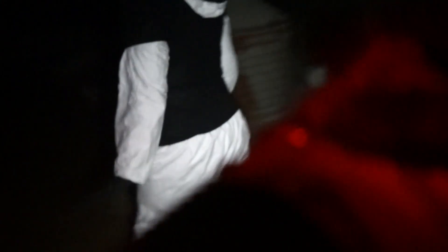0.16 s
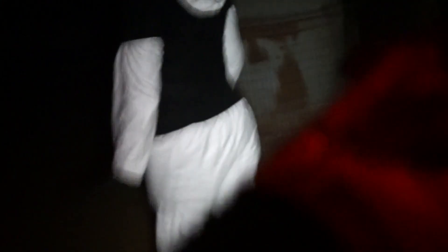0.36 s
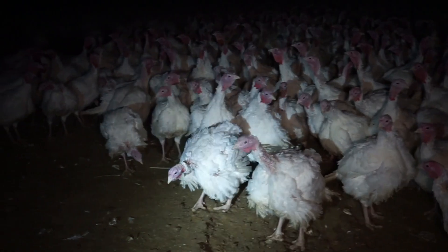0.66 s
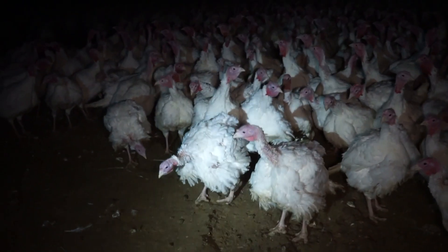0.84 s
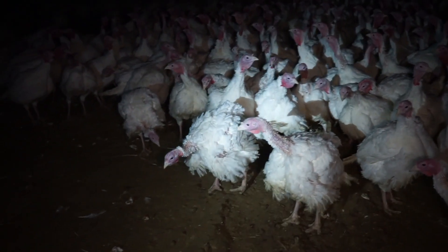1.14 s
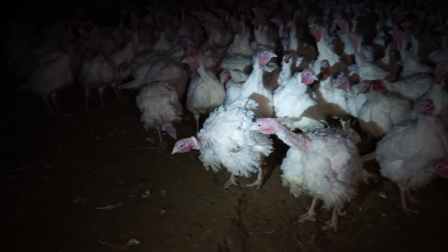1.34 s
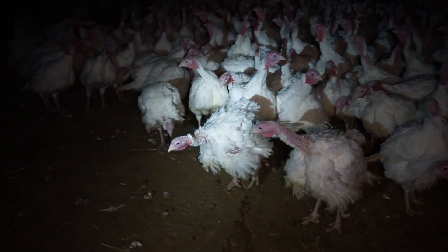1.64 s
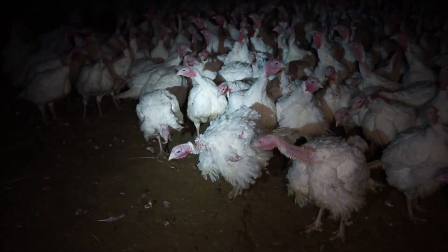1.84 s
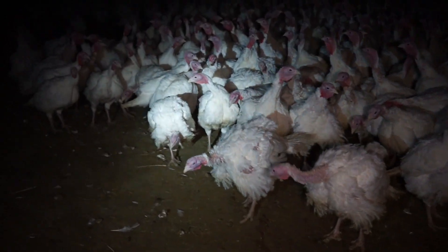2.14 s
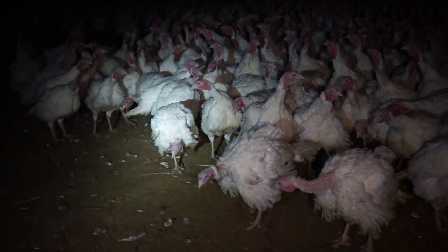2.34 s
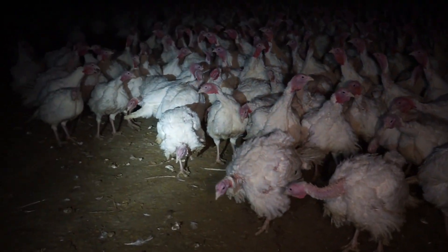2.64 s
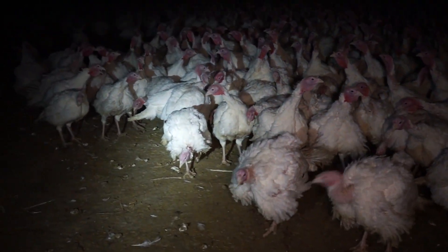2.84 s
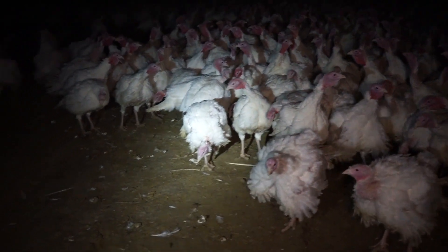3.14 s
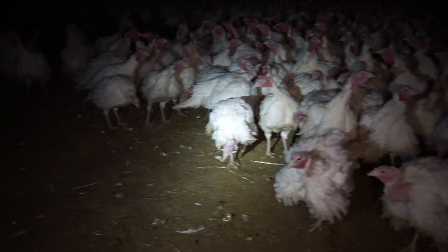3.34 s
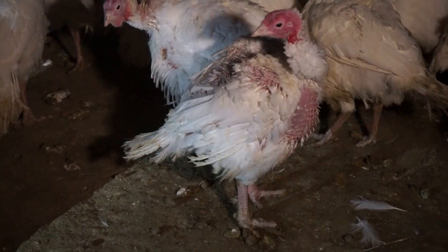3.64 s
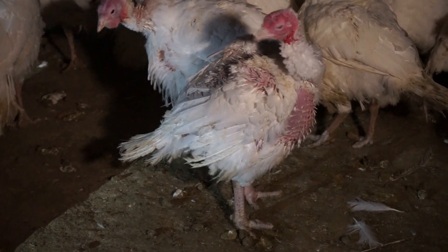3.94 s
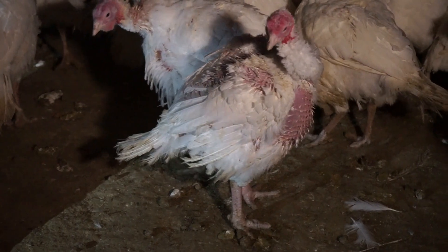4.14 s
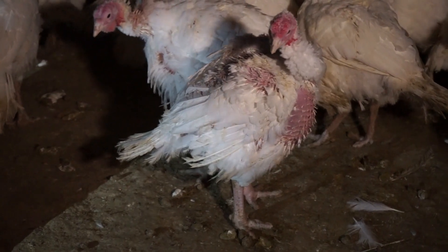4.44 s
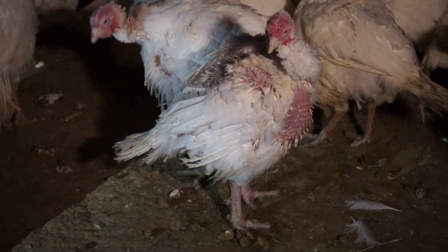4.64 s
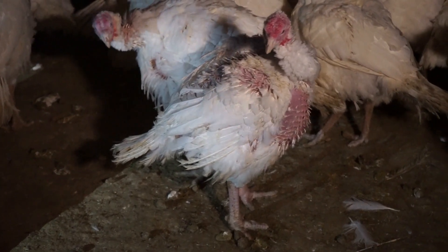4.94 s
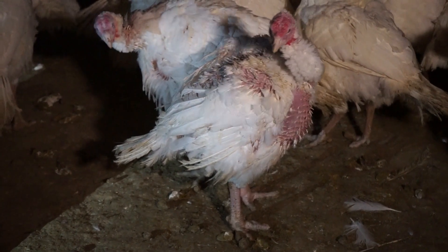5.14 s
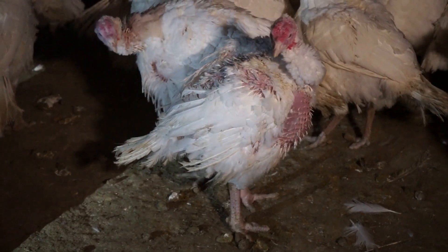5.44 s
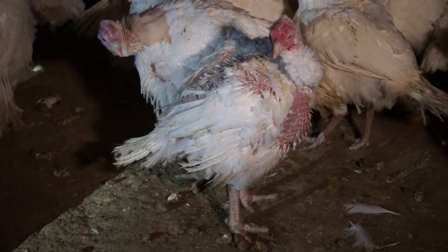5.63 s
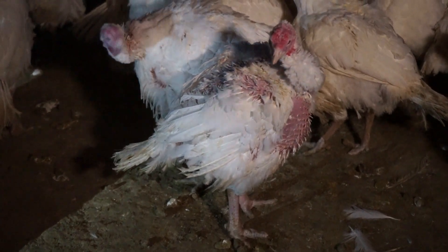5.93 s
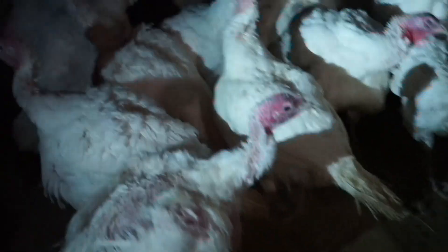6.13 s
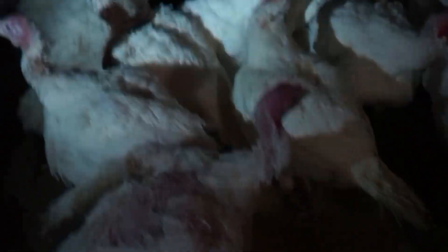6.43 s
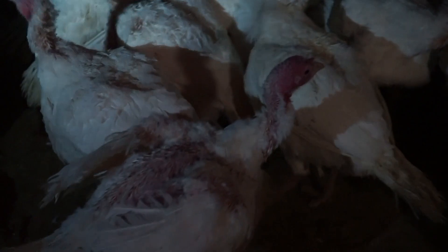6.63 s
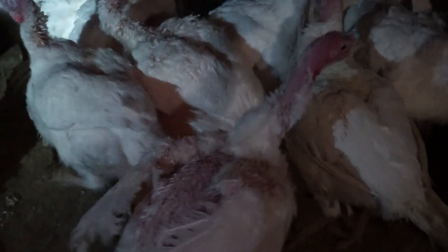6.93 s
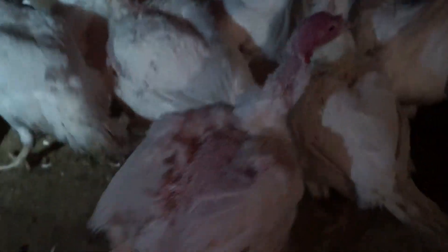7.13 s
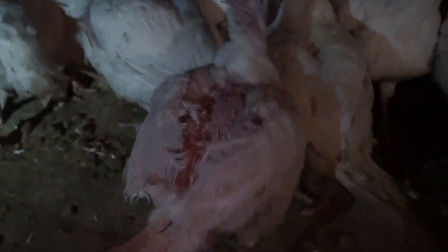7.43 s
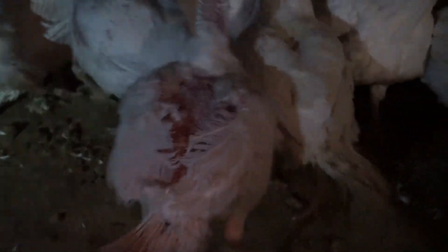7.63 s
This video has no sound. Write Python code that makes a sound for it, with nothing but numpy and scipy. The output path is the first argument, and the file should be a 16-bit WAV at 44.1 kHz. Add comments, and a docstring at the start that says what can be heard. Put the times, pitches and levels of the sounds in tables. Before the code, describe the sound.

Brief handling noise, cloth rustle and a single thud open the scene, then at once the microphone is among hundreds of turkeys indoors. Near birds give snappy, overlapping clucks and whistling yelps, slightly to the right, with small airy puffs; the rest babble behind, duller and wide. Reverberation trails each call. Calls become sparse and nearly stop, fans hum, feet scuff litter, and a lively chorus returns to the end.

```python
"""Turkey flock in a big barn

A microphone is handled outdoors for half a second: grip rumble, rustle and a thud over a fading trace of
distant birds. Then it stands among turkeys. Near clucks and yelps are gliding tones with overtones shaped
by the throat, breath puffs are bursts of noise, and hundreds of overlapping calls make the far chatter.
Coloured noise gives the fan hum and shuffling feet. Sparse decaying reflections let the barn ring after
every call, and gain control lifts the hum whenever the birds pause."""
import sys
import numpy as np
from scipy import signal
from scipy.io import wavfile
from scipy.ndimage import uniform_filter1d, map_coordinates

SR = 44100
rng = np.random.default_rng(int(sys.argv[2]) if len(sys.argv) > 2 else 0)


def volts(x):
    """Linear amplitude factor 10**(x/20) for a level x in dB, scalar or array-like."""
    e = np.asarray(x, float) / 20
    return 10 ** e


def dump(signal):
    """Clip the signal to [-1, 1] and save it as 16-bit WAV at the path in sys.argv[1]."""
    limited = np.clip(np.atleast_2d(signal).T, -1, 1)
    pcm = np.round(limited * 32767).astype(np.int16)
    wavfile.write(sys.argv[1], SR, pcm)


N = 343098
INSIDE_S = .5  # the barn begins here


def evened(x):
    """Scales a sound to an rms of one."""
    return x / np.sqrt(np.mean(x ** 2) + 1e-20)


def read(points, hz):
    """Reads a table over frequency, with straight lines on a log axis."""
    f, value = np.transpose(points)
    return np.interp(np.log(hz + 1), np.log(f + 1), value)


def curve(rows, column):
    """Draws one table column as a line over the whole scene."""
    rows = np.array(rows)
    return np.interp(np.arange(N) / SR, rows[:, 0], rows[:, column])


def add(mix, s, sound):
    """Lays a sound into the mix at s seconds, cut off at the end."""
    part = mix[..., round(s * SR):][..., :sound.shape[-1]]
    part += sound[..., :part.shape[-1]]


def panned(x, pan_db):
    """Sets the left-right level difference; positive leans left."""
    return x * volts(np.array([pan_db / 2, -pan_db / 2]).reshape(2, -1))


def alike(z, same):
    """Blends the second channel's spectrum towards the first."""
    same = np.clip(same, -1, 1)[:, None]
    return np.array([z[0], same * z[0] + np.sqrt(1 - same ** 2) * z[1]])


def hiss(spectrum, same, patchy_db):
    """Stereo noise of a given colour with drifting patches."""
    hz = np.fft.rfftfreq(1024, 1 / SR)
    a, b, c, d, patches = rng.standard_normal((N // 256 + 5, 513, 5)).T
    patches = uniform_filter1d(patches, size=9, axis=0)
    patches = evened(uniform_filter1d(patches, size=9, axis=1))
    z = alike([a + 1j * b, c + 1j * d], read(same, hz))
    z = z * volts(read(spectrum, hz)[:, None] + patchy_db * patches)
    return evened(signal.istft(z, nperseg=1024, noverlap=768)[1][:, :N])


# Windpipe and mouth resonances that lift the overtones.
# Each row: centre in Hz, width in Hz, strength in dB.
THROAT = [(1680, 1040, -5), (2270, 1000, -22), (3525, 270, -4.5), (5840, 250, 0.5), (8070, 470, -11)]


def call(db, start_hz, end_hz, length, overtones_db, rough, dull=0.7, attack_s=0.0052):
    """A gliding whistle from the voice box whose upper overtones and rasp grow as the beak opens."""
    flutter_db = 5  # unsteady breath makes the longer calls waver in level
    u = np.linspace(0, 1, max(round(length * SR), 200))  # progress through the call
    seconds = u * length

    unsteady = uniform_filter1d(rng.standard_normal((2, 7000)), size=40)[:, :len(u)]
    shake, rasp = unsteady * rough * u ** 1.66
    breath = uniform_filter1d(rng.standard_normal(700), size=30)
    breath_db = flutter_db * evened(uniform_filter1d(breath, size=30))
    breath_db = np.repeat(breath_db, 10)[:len(u)] * np.minimum(seconds / 0.055, 1)

    hz = start_hz * (end_hz / start_hz) ** u ** 1.323 * (1 + 0.84 * shake)
    turns = 2 * np.pi * np.cumsum(hz) / SR
    order = np.arange(2, 12)[:, None]
    throat = 0.13 + sum(volts(d) / (1 + (2 * (order * hz - f) / w) ** 2) for f, w, d in THROAT)
    fall_db = 6.64 + 3.3 * (1 - u) ** 2  # per order: steep while the beak is still shut
    overtones = volts(overtones_db - dull * fall_db * (order - 3)) * throat
    overtones = overtones * (order * hz < .4 * SR)  # keeps clear of aliasing

    voice = np.sin(turns) * (1 + 0.43 * rasp)
    upper = (overtones * np.sin(order * turns + 0.641 * order ** 2)).sum(0)
    voice = voice + upper * (1 + 5.4 * rasp)
    swell = np.sin(np.pi / 2 * np.minimum(seconds / max(attack_s, .001), 1)) ** 2
    release = np.minimum((1 - u) * length / 0.0013, 1)
    return volts(db + breath_db) * voice * swell * np.exp(.3 - 0.11 * u) * release


# Short clucks close by, pitch snapping up or sagging.
# Each row: start in seconds, level in dB, start pitch in Hz, end pitch in Hz, overtones in dB.
CLUCKS = [(0.498, -13.5, 890, 954, -35), (0.548, -16, 765, 1416, -17), (.83, -5.5, 800, 1180, -30),
          (.874, -15.5, 1048, 888, -6), (1.079, -7, 1240, 1290, -10), (1.085, -5.5, 1227, 1570, -12.5),
          (1.133, -6.5, 1118, 1350, -17), (1.148, -19, 1270, 1730, -11), (1.186, -20.5, 944, 773, 0),
          (1.585, -11, 836, 1257, -9.5), (1.92, -10, 1004, 1407, -15), (2.004, -13.5, 1167, 1172, -8.5),
          (2.135, -9, 1009, 1320, -26), (2.144, -17.5, 1280, 1880, -16), (2.185, -10.5, 1137, 1200, -1.5),
          (2.196, -4, 1820, 1599, -19), (2.27, -11, 777, 1040, -6), (2.324, -15.5, 1170, 1490, -12),
          (2.467, -14.5, 1246, 1383, -10.5), (2.475, -18.5, 932, 1685, -9.5), (2.522, -15, 816, 1340, -25),
          (2.631, -8.5, 1248, 1348, -5.5), (2.644, -11.5, 1278, 1470, -85), (3.076, -16, 1037, 1290, -6.5),
          (3.086, -10, 1220, 1980, -38), (3.152, -10.5, 1145, 1764, -7.5), (3.178, -12, 1222, 2080, -20),
          (3.326, -15, 998, 1410, -14), (3.741, -17, 1010, 856, -17), (4.019, -11, 1020, 1540, -25),
          (4.14, -15.5, 781, 687, 2.5), (4.436, -10.5, 1075, 1393, -4), (4.646, -21.5, 775, 985, -34),
          (4.82, -26, 1042, 1367, -13), (5.064, -18.5, 764, 1228, -7), (5.076, -44, 824, 890, 2),
          (5.294, -31.5, 693, 680, -28), (5.359, -31, 863, 814, -29), (5.811, -8.5, 828, 1084, -39.5),
          (5.895, -15, 993, 850, -59), (5.947, -15, 980, 840, -25.5), (6.171, -11, 903, 1108, -3),
          (6.188, -7, 1375, 1427, -17), (6.288, -7.5, 1314, 1550, -14), (6.505, -26.5, 794, 876, -30),
          (6.702, -9.5, 1036, 1306, -16), (6.74, -4.5, 954, 1170, -16), (6.791, -19.5, 1524, 2020, -10),
          (7.04, -11, 1124, 1610, -19), (7.085, -9.5, 930, 1580, -14.5), (7.098, -18, 1383, 1250, -31),
          (7.165, -11, 1432, 1428, -13), (7.197, -30, 1450, 1466, -8), (7.348, -12.5, 1013, 1030, -36),
          (7.372, -7.5, 999, 872, -13), (7.521, -13, 1258, 1028, -8), (7.595, -19.5, 835, 1213, -38),
          (7.654, -16.5, 1007, 1580, -13)]
# Near yelps, from brief chirps to longer whistles.
# Each row: start in seconds, level in dB, start pitch in Hz, end pitch in Hz, length in seconds,
# overtones in dB.
YELPS = [(.601, -20, 857, 933, 0.033, -7), (0.687, -18, 1400, 1287, 0.063, -10.5),
         (0.999, -9.5, 1250, 1370, 0.024, -12), (1.315, -7.5, 936.5, 920, 0.07, -29),
         (1.435, -14, 1006, 860, 0.062, -30), (1.504, -13.5, 1044, 1006, 0.027, -9),
         (1.64, -28, 926, 922, 0.042, 4.5), (1.751, -13, 1156, 1135, 0.039, -14.5),
         (2.423, -27, 766, 723, 0.071, -9), (2.603, -14.5, 1397, 1335, 0.084, -28),
         (2.706, -15.5, 1334, 1320, 0.053, -9.5), (2.803, -16, 848, 962, .032, -13),
         (2.873, -13, 978, 926, 0.021, -17), (2.959, -18.5, 954, 794, 0.033, -36),
         (3.338, -12.5, 1282, 1510, 0.04, -20), (3.365, -14, 1558, 1508, 0.11, -15),
         (3.576, -21, 1100, 930, 0.026, -28), (3.814, -22, 721, 775, 0.051, -25),
         (3.863, -24, 568, 535, 0.025, -30), (5.697, -18.5, 807.5, 1023, 0.078, -32),
         (5.746, -21, 892, 1110, 0.036, -19.5), (6.02, -20, 1046, 1010, 0.026, -3.5),
         (6.328, -18.5, 1353, 1294, 0.046, -7), (6.391, -21, 1380, 1390, 0.014, -27),
         (6.6, -22, 793, 926, 0.092, -55), (6.782, -11, 1488, 1545, 0.021, -10),
         (6.803, -18, 1545, 1537, .158, -18.5), (7.325, -16.5, 1069, 965, 0.088, -12),
         (7.446, -19, 931, 864, 0.038, -17), (7.712, -12, 1274, 1192, 0.021, -11),
         (7.726, -12, 1190, 1305, 0.021, -7)]
# Low rising squawks, mostly overtones.
# Each row: start in seconds, level in dB, start pitch in Hz, length in seconds.
SQUAWKS = [(5.903, -41, 607, 0.017), (5.953, -30, 640, 0.028), (5.995, -30.5, 656, 0.029),
           (6.073, -21, 570.4, 0.0245), (6.112, -25, 621, 0.0256), (6.141, -23, 581, 0.018)]
# One thin falling squeak, rich in high overtones.
# Each row: start in seconds, level in dB, start pitch in Hz, end pitch in Hz, length in seconds,
# overtones in dB.
SQUEAK = [(2.856, -24, 1010, 945, .04, .5)]


def near_birds():
    """The single calls close by: what comes straight, and what they send into the barn."""
    cluck_s, cluck_s_per_octave = 0.01522, 0.00594  # a wider glide takes longer
    cluck_attack_s, yelp_swell = 0.0048, 0.29  # yelp_swell: share of a yelp spent swelling
    squawk_rise, squawk_overtones_db = 1.09, 9.5
    cluck_barn_db, yelp_barn_db = -1, -8.5  # share sent into the barn by a call at close_db
    # fainter birds stand further off, so more of them is barn
    farther_per_db, close_db = 0.3642, -17

    calls = []
    for s, db, start_hz, end_hz, over_db in CLUCKS:
        length = cluck_s + cluck_s_per_octave * abs(np.log2(end_hz / start_hz))
        calls.append((s, db, start_hz, end_hz, length, over_db, cluck_attack_s, cluck_barn_db))
    for row in YELPS:
        calls.append((*row, yelp_swell * row[4], yelp_barn_db))
    for s, db, hz, length in SQUAWKS:
        calls.append((s, db, hz, hz * squawk_rise, length, squawk_overtones_db,
                      cluck_attack_s, yelp_barn_db))

    straight, sent = np.zeros((2, N))
    for s, db, *row, attack_s, barn_db in calls:
        voice = call(db, *row, rough=.55, attack_s=attack_s)
        add(straight, s, voice)
        add(sent, s, volts(barn_db + farther_per_db * (close_db - db)) * voice)
    for s, *row in SQUEAK:
        squeak = call(*row, rough=0.11, dull=0.35)
        add(straight, s, squeak)
        add(sent, s, volts(-7.5) * squeak)
    return straight, sent


# Breath bursts as a beak snaps open.
# Each row: time in seconds, level in dB, left-right difference in dB.
PUFFS = [(0.7, -29, -2), (0.836, -27, -5), (0.994, -23, -2), (1.09, -24.5, -3), (1.2354, -21.5, -2),
         (1.373, -32, -19), (1.4657, -27, -1.0), (1.6044, -16, 1), (1.755, -25, 9.5), (1.931, -15, -1),
         (2.144, -25.5, -13), (2.1895, -15.5, 1), (2.4695, -29, 3), (2.519, -30.5, -9), (2.638, -23.5, -5),
         (2.713, -21.5, -2), (2.8681, -30, 2), (3.1415, -19.5, -2), (3.337, -16, -3), (3.575, -31.5, 2),
         (4.0334, -20, -4), (4.151, -20, -8), (4.447, -23, -6), (4.824, -26, -2), (5.8164, -26.5, 4),
         (6.088, -26.5, -7), (6.1711, -24.5, 1), (6.305, -15.5, 4), (6.714, -27.5, -2.5), (6.7916, -13, 0),
         (7.081, -15.5, -4.0), (7.113, -27, -3), (7.3299, -33, -13), (7.3826, -18.5, -4),
         (7.5215, -28.5, 10.5), (7.668, -12, -1), (7.7275, -17.5, -4)]
# Colour of the breath. Each row: frequency in Hz, density in dB per Hz.
PUFF_COLOUR = [(1470, -20), (2500, 2), (3530, -3.5), (4350, -7), (7160, -6), (9230, -15), (15700, -23.5)]


def puffs():
    """Short bright bursts of air that swell and fade."""
    u = np.arange(4000) / SR / 0.0063
    burst = u ** 1.79 * np.exp(-u) + 0.17 * u * np.exp(-u / 3.07)
    shape = np.zeros((2, N))
    for s, db, pan_db in PUFFS:
        add(shape, s - .0065, volts(db) * panned(burst, pan_db))  # the swell leads in early
    return shape * hiss(PUFF_COLOUR, [(0, 0.35), (20000, 0.19)], patchy_db=1.5)


# Loudness of the far flock's chatter. Each row: time in seconds, level in dB.
FLOCK_LEVEL = [(.5, -21.5), (.62, -17), (1.15, -21), (1.49, -18), (1.82, -24.5), (2.08, -22), (2.55, -21),
               (3.58, -28.5), (4.13, -30), (4.29, -62), (4.49, -25), (4.8, -30), (5.33, -37.5),
               (5.68, -44.5), (5.8, -20.5), (5.92, -19), (6.0, -22.5), (6.22, -23), (6.4, -34.5),
               (6.78, -25), (7.41, -25.5), (7.78, -25.5)]


def far_flock(count=480):
    """Many short, mostly rising calls at random moments, pitches and places, a few louder than the rest."""
    middle_hz, lowest_hz = 851.9, 569.8  # lowest_hz: deepest voice in the flock
    overtones_db, overtones_spread_db = -11.5, 16  # some birds call brighter than others
    mix = np.zeros((2, N))
    for when, high, higher, glide, long, loud, side, bright in rng.random((count, 8)):
        at = int(when * (N - 1))
        start_hz = middle_hz * np.exp(.55 * (high + higher - 1))
        start_hz = max(start_hz, lowest_hz * (1 + 0.108 * side))
        end_hz = start_hz * (.95 + 0.333 * glide ** 1.6)
        low_db = 3.36 * min(np.log2(start_hz / 800), 0)  # low voices carry less
        voice = call(6.9 * loud ** 2 + low_db, start_hz, end_hz, 0.01281 + 0.03 * long ** 3,
                     overtones_db + overtones_spread_db * (bright - .5), rough=0.7)
        add(mix, at / SR, panned(voice, 10.0 * (side - .6)))
    return evened(mix) * volts(curve(FLOCK_LEVEL, column=1))


# Sound from the right reaches the left port later. Each row: time in seconds, lag in samples.
LEFT_LAG = [(.5, 1.17), (5.5, 3.3), (5.8, 5.4), (7.78, 6.4)]


def ports(x):
    """Delays the left channel as two spaced microphone ports do."""
    at = np.arange(N) - curve(LEFT_LAG, column=1)
    return np.array([map_coordinates(x[0], [at], order=3, mode="nearest"), x[1]])


# Reflections off floor and walls.
# Each row: delay in seconds, level in dB, left-right difference in dB.
ECHOES = [(.006, -13.5, 3), (.015, -3, 2.5), (.023, -8, -8), (.031, -8, -4), (.047, -14, 15)]


def echoes(x):
    """The first single reflections, each a delayed and panned copy."""
    out = np.zeros((2, N))
    for delay, db, pan_db in ECHOES:
        add(out, delay, volts(db) * panned(x, pan_db))
    return out


# How long the barn rings. Each row: frequency in Hz, time to fall 60 dB in seconds.
BARN_T60 = [(300, 0.44), (900, 0.92), (2000, 0.64), (4000, 0.65), (9000, 0.41), (16000, 0.3)]
# Width of the ring. Each row: frequency in Hz, left-right likeness from -1 to 1.
BARN_SAME = [(200, 1), (600, 0.85), (1200, 0.63), (2500, -0.056), (4000, -0.085), (8000, 0.063)]


def barn(x, gap_s, count=3):
    """Sparse uneven reflections dying band by band; three tails take turns so calls ring differently."""
    out, turn = np.zeros((2, N)), np.arange(N) / SR * np.pi / 0.909
    for k in range(count):
        # one reflection at a random spot in every 50 samples
        taps = np.zeros((2, SR))
        at = np.arange(0, SR - 50, 50) + rng.integers(0, 50, (2, SR // 50 - 1))
        sizes = rng.choice([-1., 1.], at.shape) * volts(5.13 * rng.standard_normal(at.shape))
        np.put_along_axis(taps, at, sizes, 1)

        hz, t, z = signal.stft(taps, SR, nperseg=256)
        t60 = np.maximum(read(BARN_T60, hz), .05)[:, None]
        z = alike(z, read(BARN_SAME, hz)) * volts(-60 * t / t60)
        tail = signal.istft(z, SR, nperseg=256)[1]
        tail = tail / np.linalg.norm(tail[0])

        share = np.sqrt(2 / count) * np.cos(turn + k * np.pi / count)
        add(out, gap_s, signal.fftconvolve((x * share)[None], tail, axes=1))
    return out


# Feet and feathers shuffling in the litter. Each row: time in seconds, level in dB.
SHUFFLE_LEVEL = [(.5, -23.5), (.68, -44.5), (1.47, -36.5), (1.7, -40.5), (2.24, -41), (3.44, -47),
                 (3.94, -36.5), (4.23, -39.5), (4.51, -47.5), (5.02, -38.5), (5.4, -39), (5.7, -44),
                 (6.9, -43), (7.0, -30.5), (7.13, -32.5), (7.4, -47), (7.7, -45)]
# Colour of the litter. Each row: frequency in Hz, density in dB per Hz.
LITTER_COLOUR = [(200, -7), (600, 2.5), (1500, 1), (4000, -8.5), (8000, -10.5), (12000, -12.5),
                 (15900, -19)]


def shuffling():
    """Feet in litter as patchy noise that rises and falls with the movement."""
    same = [(200, 0.95), (1500, 0.0), (4000, 0.23), (16000, 0.43)]  # (Hz, left-right likeness)
    litter = hiss(LITTER_COLOUR, same, patchy_db=2.5)
    return volts(curve(SHUFFLE_LEVEL, column=1)) * panned(litter, 0.4)


# Loudness of the fan hum, stronger from about 3.7 s to 5.6 s. Each row: time in seconds, level in dB.
FANS_LEVEL = [(.5, -46), (1.4, -39.5), (3.4, -43), (3.75, -37), (5.6, -37.5), (6.1, -41.5), (7.78, -43.5)]
# Colour of the hum. Each row: frequency in Hz, density in dB per Hz.
FANS_COLOUR = [(20, -29), (50, -7.5), (130, -2.5), (250, -6.5), (500, -19), (1200, -42), (3000, -52)]
# Width of the hum. Each row: frequency in Hz, left-right likeness from -1 to 1.
FANS_SAME = [(60, 1.0), (240, 1), (950, 1), (3770, 0.12), (15000, 0.12)]


def fans():
    """Fan hum as low noise, alike in both channels at the bottom and wide above."""
    return volts(curve(FANS_LEVEL, column=1)) * hiss(FANS_COLOUR, FANS_SAME, patchy_db=3.5)


def distant_birds():
    """A trace of birds outdoors: a narrow band of noise around one pitch, fading until the barn begins."""
    pitch_hz, start_db, fade_db_per_s = 1175, -25, 148
    t = np.arange(N) / SR
    turn = np.exp(2j * np.pi * pitch_hz * t)
    waver = uniform_filter1d(rng.standard_normal((2, N)), size=250)
    band = evened((turn * (waver[0] + 1j * waver[1])).real)
    return band * volts(start_db - fade_db_per_s * np.minimum(t, INSIDE_S))


# Hands on the microphone. Each row: time in seconds, rumble level in dB, rustle level in dB.
HANDLING = [(0, -35.5, -34.5), (.056, -33, -26), (.1, -25.5, -30), (.256, -43, -30.5), (.32, -32, -25.5),
            (.352, -36, -17), (.39, -24.5, -23.5), (.48, -32.5, -29), (.5, -57, -26)]
# Colour of the cloth rustle. Each row: frequency in Hz, density in dB per Hz.
RUSTLE_COLOUR = [(59, -41), (100, -13.5), (521, -10.5), (847, -15), (1320, -15), (1470, -16), (8490, -24),
                 (15700, -27.5)]
# A single thud. Each row: time in seconds, level in dB.
THUD = [(0.356, -1.5)]


def handling():
    """Noise rumble of a gripped microphone, cloth rustle and one thud over the distant birds."""
    rumble_colour = [(20, -4), (60, 1), (150, 0), (300, -11), (600, -54.0)]  # (Hz, dB per Hz)
    rumble = hiss(rumble_colour, [(0, 1), (20000, 1)], patchy_db=-3.5)
    rustle = hiss(RUSTLE_COLOUR, [(0, 1), (500, 0.85), (3000, 0.072)], patchy_db=2.0)
    mix = rumble * volts(curve(HANDLING, column=1))
    mix += rustle * volts(curve(HANDLING, column=2))
    mix += distant_birds()
    u = np.arange(-60, 600) / SR / 0.0011
    push = (1 - u) * np.exp(-abs(u)) * (u > -.4)  # a push and its rebound
    for s, db in THUD:
        add(mix, s - .0015, volts(db) * push)
    return mix


# Where the near birds stand. Each row: time in seconds, left-right difference in dB.
NEAR_PAN = [(.5, -4), (2, -3.5), (3.7, -4.5), (5.7, -6), (7.78, -6)]


def scene():
    """Handling outdoors first, then a hard cut to the flock with its echoes, ring, fans and litter."""
    distance_hz = 2400  # far birds lose their treble above this
    (straight, sent), far, air = near_birds(), far_flock(), puffs()
    dulled = signal.lfilter(*signal.butter(2, distance_hz, fs=SR), far)
    inside = ports(panned(straight, curve(NEAR_PAN, column=1)) + air + dulled)
    inside += echoes(sent)
    into_barn = volts(-1) * sent + volts(-1.0) * far.mean(0) + volts(-1.5) * air.mean(0)
    inside += barn(into_barn, gap_s=.012)
    inside += fans()
    inside += shuffling()
    return np.where(np.arange(N) < INSIDE_S * SR, handling(), inside)


def roll_off(x):
    """The treble ends steeply here."""
    return signal.sosfilt(signal.butter(12, 15830, fs=SR, output="sos"), x)


def record(dry):
    """Gain control inside the barn, one slow stage and one quick duck on loud calls, then a soft ceiling."""
    start, power = round(INSIDE_S * SR), (dry ** 2).mean(0)
    slow, quick = np.exp(-1 / (.3 * SR)), np.exp(-1 / (0.062 * SR))  # memories of 0.3 s and 62 ms
    # the slow stage enters the barn already turned down
    slow_power = signal.lfilter([1 - slow], [1, -slow], power[start:], zi=[volts(-17.5)])[0]
    quick_power = signal.lfilter([1 - quick], [1, -quick], power[start:])
    slow_db = 10 * np.log10(slow_power)
    quick_db = 10 * np.log10(quick_power + 1e-9)
    gain_db = -.4 * (slow_db + 17.5) - 0.44 * np.maximum(quick_db + 14.0, 0)
    gain = np.r_[np.ones(start), volts(gain_db)]
    finished = np.clip(1.351 * np.tanh(dry * gain / 1.285), -1, 1)
    return roll_off(finished)


dry = scene()
out = record(dry)
dump(out)
```